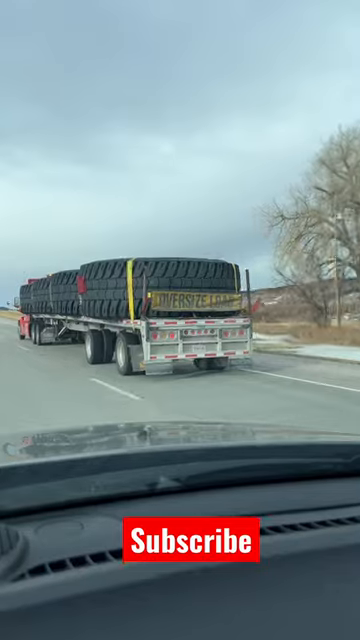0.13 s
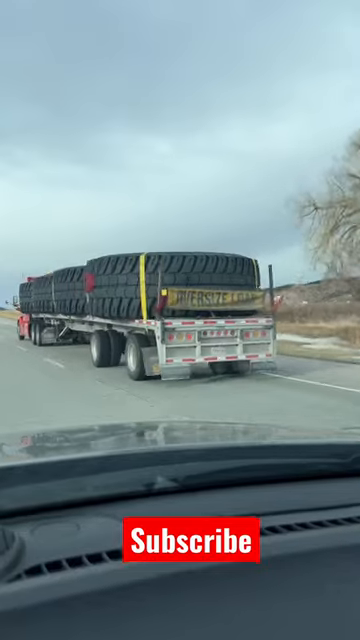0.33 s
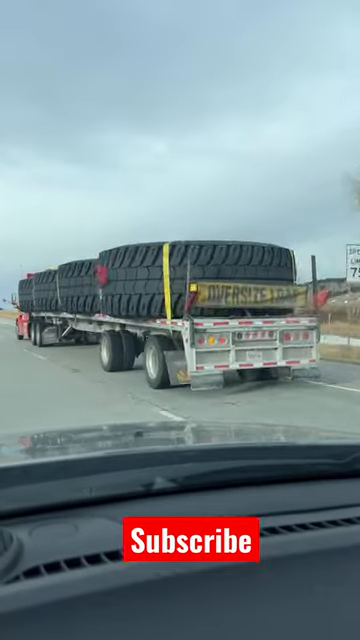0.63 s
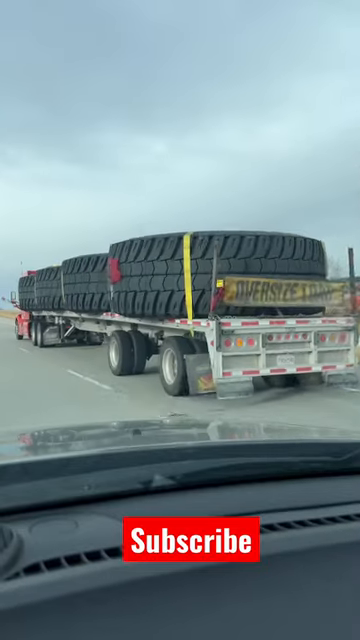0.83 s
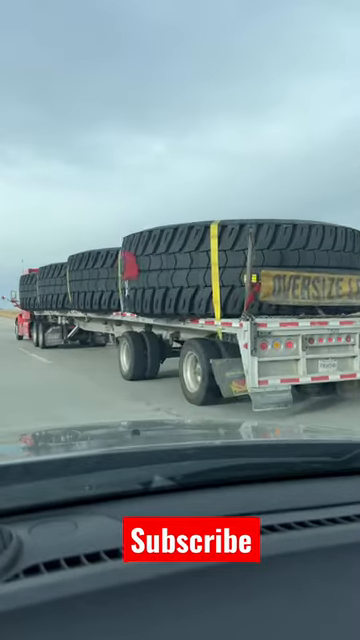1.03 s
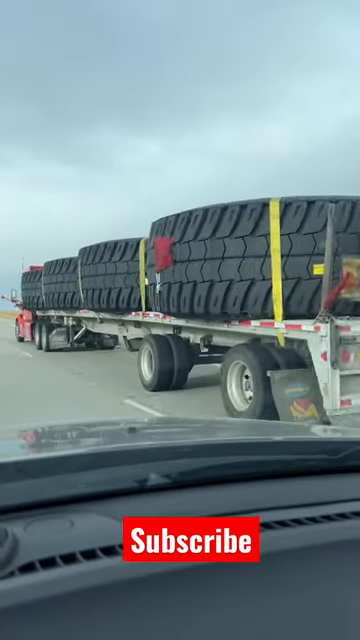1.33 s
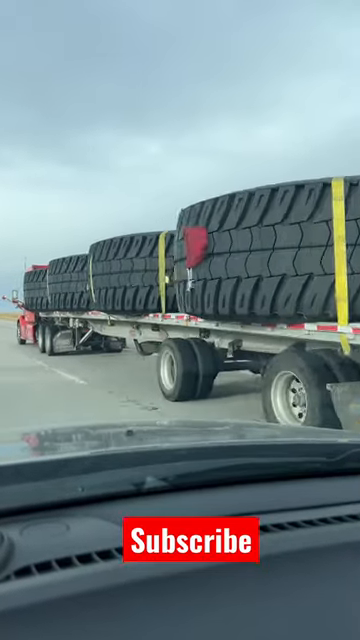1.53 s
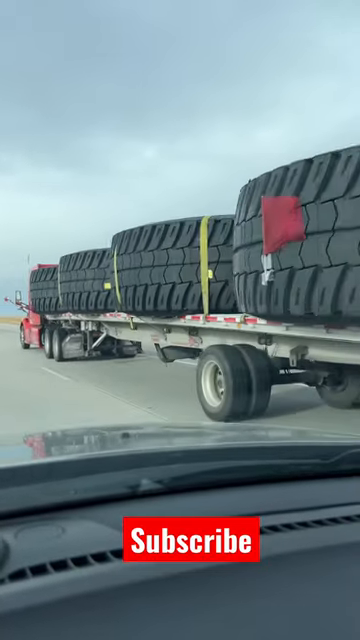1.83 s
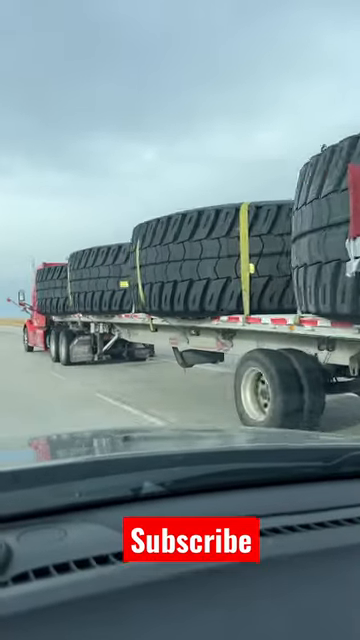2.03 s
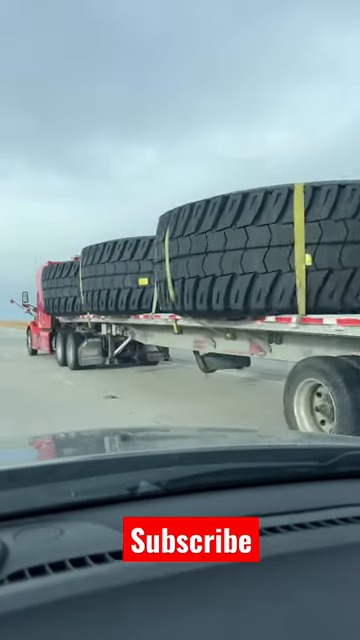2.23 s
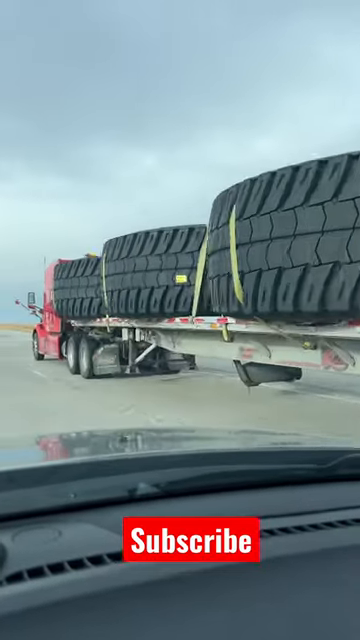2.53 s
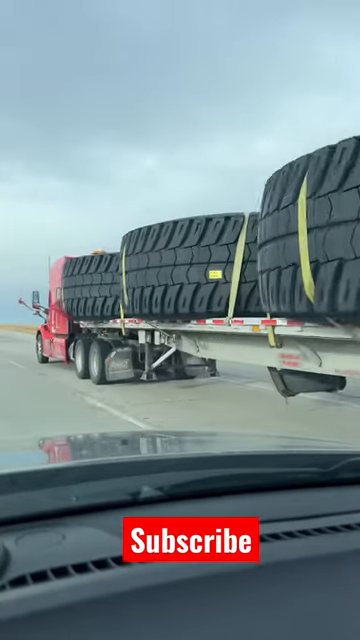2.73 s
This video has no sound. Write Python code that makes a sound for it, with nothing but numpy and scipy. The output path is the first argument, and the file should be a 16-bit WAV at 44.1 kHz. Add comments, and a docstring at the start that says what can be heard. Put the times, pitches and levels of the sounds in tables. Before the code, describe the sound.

Continuous low road rumble inside a car on a highway, starting abruptly after a tiny silence and running to the end at about 3 seconds. Bass boom and shudder swell irregularly several times a second, over steady drone and muffled tyre roar. Faint wind hiss flutters with small gusts from 0.4 to 1.8 s. A weak truck tread hum sinks slightly around 2 s; a brief soft hiss peaks at 2.1 s.

```python
"""Car overtaking a truck

Inside a car passing a flatbed truck on a highway. Shaped noise gives the road's shudder, boom and drone,
the tyres' roar and rasp, and the wind at windows and seals; narrow noise bands hum at fixed pitches.
The truck's tread is a wavering sine that sinks in pitch as its trailer wheels go by.
One brief bright hiss passes; a faint whine lies above it all."""
import sys
import numpy as np
from scipy import signal
from scipy.fft import rfft, irfft, next_fast_len
from scipy.io import wavfile
from scipy.ndimage import uniform_filter1d

SR = 44100
rng = np.random.default_rng(int(sys.argv[2]) if len(sys.argv) > 2 else 0)


def master(y):
    """Save y as 16-bit WAV."""
    cut = np.clip(np.atleast_2d(y).T, -1, 1)
    pcm = np.round(cut * 32767)  # scale
    wavfile.write(sys.argv[1], SR, pcm.astype(np.int16))


N = 126567
TIME_S = np.arange(N) / SR
FFT_SIZE = next_fast_len(N)
HZ = np.maximum(np.arange(FFT_SIZE // 2 + 1) * SR / FFT_SIZE, 1)
SIDES = np.array([[1], [-1]])  # left, right

# deep suspension shudder: time_s, level_db
SHUDDER_LEVEL = [(0.05, -24), (0.38, -30), (0.56, -41), (0.64, -23), (0.78, -30), (0.88, -26.5),
                 (1.0, -27.5), (1.3, -29), (1.53, -24), (1.9, -25.5), (2.03, -33), (2.48, -22.5),
                 (2.85, -32.5)]
# body boom: time_s, level_db
BOOM_LEVEL = [(0.05, -19), (0.2, -21.5), (0.27, -19), (0.34, -20.5), (0.43, -18), (0.5, -22), (0.62, -19.5),
              (0.73, -17), (0.84, -26), (0.92, -17.5), (0.98, -23.5), (1.05, -17), (1.2, -21.5),
              (1.43, -15.5), (1.75, -22), (1.87, -16), (1.97, -20.5), (2.08, -14), (2.18, -26), (2.31, -18),
              (2.4, -16), (2.59, -24), (2.67, -19.5), (2.73, -25), (2.85, -19.5)]
# road drone in the cabin: time_s, level_db
DRONE_LEVEL = [(0.05, -25.5), (0.14, -27.5), (0.24, -22), (0.35, -24.5), (0.6, -24.5), (0.86, -23),
               (0.99, -26), (1.08, -22), (1.28, -24.5), (1.49, -21.5), (1.67, -24.5), (1.88, -22.5),
               (1.97, -26.5), (2.22, -23.5), (2.3, -26.5), (2.45, -25), (2.54, -28.5), (2.6, -22.5),
               (2.7, -27), (2.85, -24.5)]
# low tyre roar: time_s, level_db
ROAR_LEVEL = [(0.05, -32.5), (0.2, -34.5), (0.41, -36), (0.5, -35.5), (0.56, -34), (0.83, -35),
              (1.04, -36.5), (1.25, -35), (1.45, -32.5), (1.55, -35), (1.62, -36.5), (1.68, -35.5),
              (1.88, -34.5), (2.03, -38.5), (2.08, -33), (2.33, -34), (2.6, -34.5), (2.85, -35)]
# higher tyre rasp: time_s, level_db
RASP_LEVEL = [(0.05, -36.5), (0.53, -36.5), (0.65, -37.5), (0.77, -37), (0.85, -38), (0.95, -36.5),
              (1.14, -37.5), (1.23, -35), (1.51, -37.5), (1.59, -34.5), (1.89, -36.5), (1.98, -34),
              (2.08, -37.5), (2.17, -35.5), (2.42, -36.5), (2.68, -37.5), (2.85, -36.5)]
# wind at the windows: time_s, level_db
WINDOW_LEVEL = [(0.05, -43), (0.25, -46.5), (0.4, -45), (0.75, -44.5), (0.95, -44.5), (1.25, -44.5),
                (1.5, -44.5), (1.63, -44.5), (1.75, -45), (2.1, -43.5), (2.3, -45), (2.85, -46)]
# thin hiss at the door seals: time_s, level_db (relative to SEAL_DB)
SEAL_LEVEL = [(0.2, -7), (0.35, -3), (0.53, -4), (0.7, -1.5), (0.93, -2), (1.02, 0), (1.3, -.5), (1.5, -.5),
              (1.68, -2.5), (1.85, 0), (2.0, -2), (2.14, -2), (2.23, -5), (2.85, -6)]
# short gusts over the door seals: peak_s, lift_db
SEAL_GUSTS = [(0.455, 7), (0.79, 5.5), (1.17, 2.5), (1.24, 4), (1.355, 3.5), (1.51, 2), (1.83, 1.5)]

# shudder spectrum: freq_hz, relative_density_db
SHUDDER_SPECTRUM = [(12, -38), (17, -26.5), (26, -8.5), (35, 18.5), (44, 8), (54, 14), (70, -14.5)]
# boom spectrum: freq_hz, relative_density_db
BOOM_SPECTRUM = [(46, -9.5), (56, 1), (70, 2.5), (100, 0), (108, -3.5), (128, -5), (145, -22), (200, -32.5)]
# drone spectrum: freq_hz, relative_density_db
DRONE_SPECTRUM = [(60, -44), (115, -16), (140, 0), (165, -1), (195, -3), (215, -3), (250, -5.5), (295, -7),
                  (350, -13.5), (450, -29), (900, -90)]
# roar spectrum: freq_hz, relative_density_db
ROAR_SPECTRUM = [(150, -43.5), (290, -5), (370, -1.5), (480, -2), (560, -4), (680, -23.5)]
# rasp spectrum: freq_hz, relative_density_db
RASP_SPECTRUM = [(450, -19), (580, -4), (640, -2), (750, 0), (900, -7.5), (1060, -11), (1250, -11),
                 (1500, -18), (2100, -27), (5000, -67)]
# window wind spectrum: freq_hz, relative_density_db
WINDOW_SPECTRUM = [(700, -30.5), (1400, -15), (1700, -7.5), (2000, -6.5), (2500, -0.5), (2900, -2),
                   (3300, -5.5), (4100, -10), (4700, -16.5), (6000, -26), (8200, -32.5), (9100, -50),
                   (15000, -57)]
# seal hiss spectrum: freq_hz, relative_density_db
SEAL_SPECTRUM = [(2500, -32.5), (4200, 1.5), (4900, -3.5), (5700, -3), (6500, -8), (7300, -20),
                 (8300, -24.5), (9100, -39.5), (15000, -50)]
# brief hiss spectrum: freq_hz, relative_density_db
HISS_SPECTRUM = [(3000, -25.5), (5000, -2.5), (6500, 1.5), (8300, -4), (10000, -13.5), (12000, -17.5),
                 (16000, -24)]

# rings of tyre cavities, panels, tread and air leaks: pitch_hz, width_hz, level_db, left_minus_right_db
RESONANCES = [(76, 42, -27.5, -0.5), (115.5, 4.5, -29, 0), (195.1, 11, -30.5, 0.5), (768, 31, -47.5, -1.5),
              (886, 17, -50.5, -1), (1107, 20, -56, 5.5), (1674, 36, -62.5, 4), (2520, 52, -65.5, 2)]
# faint high whine bands: pitch_hz, width_hz, level_db
WHINE_BANDS = [(9480, 65, -85), (9720, 65, -85.5)]
# likeness of the two sides: freq_hz, correlation (unitless)
SIDE_CORRELATION = [(60, 1), (190, .99), (260, 0.96), (340, 0.85), (450, 0.63), (620, 0.13), (790, 0.04),
                    (1080, 0.031), (1400, 0.15), (1700, .7), (2150, 0.32), (2500, -0.19), (3000, -0.21),
                    (3500, 0.42), (4050, 0.31), (4700, -0.25), (5600, 0.31), (7000, 0.35), (8300, 0.77),
                    (9500, 1)]
# cabin balance: freq_hz, left_minus_right_db
CABIN_BALANCE = [(60, -1.23), (200, -1), (300, -1), (750, -1.7), (1000, 1), (1250, 2.5), (1600, 0),
                 (3000, -0.5), (3700, -0.5), (4500, 0)]

# flutter and wander are rms
ROAR_FLUTTER_DB, RING_WANDER_DB = 0.73, .9
TREAD_HZ, DOPPLER_HZ, TREAD_WAVER_HZ, TREAD_FLUTTER_DB = 984, 14, 7, 3.5
TREAD_DB, TREAD_PAN_DB = -47.5, 6
ALONGSIDE_S, PASS_S = 2.02, 0.36
SEAL_DB = -58.5
WIND_FLUTTER_DB, SEAL_FLUTTER_DB = .55, .7
GUST_RISE_S, GUST_FALL_S, GUST_WINDOW_SHARE = .02, .02, .35
HISS_S, HISS_RISE_S, HISS_FALL_S, HISS_DB, HISS_FLUTTER_DB = 2.127, .11, .028, -61.5, 1.8
FLICK_S, FLICK_DB = .003, -63
START_S, FADE_S, STOPBAND_HZ = .0355, .002, 16600


def from_db(db):
    """Decibels to gain."""
    return 10 ** (np.asarray(db) / 20)


def rms_one(x):
    """Scale to an rms of 1."""
    return x / np.sqrt(np.mean(x ** 2) + 1e-20)


def in_time(rows):
    """Table value at every sample."""
    return np.interp(TIME_S, *np.transpose(rows))


def over_hz(rows):
    """Table value at every frequency, joined on a log axis."""
    freq_hz, value = np.transpose(rows)
    return np.interp(np.log(HZ), np.log(freq_hz), value)


def drift(rate_hz):
    """Low-passed random wander, rms 1, halved in amplitude at rate_hz."""
    spectrum = rfft(rng.standard_normal(FFT_SIZE))
    return rms_one(irfft(spectrum / (1 + (HZ / rate_hz) ** 2), FFT_SIZE)[:N])


def surge(at_s, rise_s, fall_s):
    """Exponential swell to 1 at at_s, then exponential decay."""
    return np.exp(-np.maximum((at_s - TIME_S) / rise_s, (TIME_S - at_s) / fall_s))


def cabin_noise(gain, pan_db):
    """Shaped stereo noise, rms 1; the two sides correlate by frequency, closely in the bass."""
    mid, side = rfft(rng.standard_normal((2, FFT_SIZE)))
    alike = np.clip(over_hz(SIDE_CORRELATION), -.999, .999)
    both = np.sqrt(1 + alike) * mid + SIDES * np.sqrt(1 - alike) * side
    panned = both * gain * from_db(SIDES * pan_db / 2)
    return rms_one(irfft(panned, FFT_SIZE)[:, :N])


def steadied(x, span_s):
    """Even out swells slower than span_s; rms 1."""
    size = max(int(span_s * SR), 2)
    power = np.mean(x ** 2, axis=0)
    power = uniform_filter1d(uniform_filter1d(power, size), size)
    return rms_one(x / np.sqrt(np.abs(power) + 1e-9))


def rush(spectrum, span_s):
    """Steadied broad noise of a given spectrum, falling steeply beyond the table's ends."""
    low_hz, high_hz = spectrum[0][0], spectrum[-1][0]
    skirts = np.minimum(1, np.minimum(HZ / low_hz, high_hz / HZ)) ** 5
    gain = from_db(over_hz(spectrum)) * skirts
    return steadied(cabin_noise(gain, over_hz(CABIN_BALANCE)), span_s)


def ring(pitch_hz, width_hz, pan_db, span_s):
    """Steadied narrow noise band with a resonance's bell-shaped response."""
    response = 1 / (1 + ((HZ - pitch_hz) / width_hz * 1.62) ** 2)
    return steadied(cabin_noise(response, pan_db), span_s)


def road():
    """Rough surface drives suspension shudder, body boom, cabin drone, tyre roar and rasp."""
    shudder = from_db(in_time(SHUDDER_LEVEL)) * rush(SHUDDER_SPECTRUM, span_s=0.036)
    boom = from_db(in_time(BOOM_LEVEL)) * rush(BOOM_SPECTRUM, span_s=.035)
    drone = from_db(in_time(DRONE_LEVEL)) * rush(DRONE_SPECTRUM, span_s=0.05)
    roar_db = in_time(ROAR_LEVEL) + ROAR_FLUTTER_DB * drift(10)  # road texture flutters the roar
    roar = from_db(roar_db) * rush(ROAR_SPECTRUM, span_s=0.16)
    rasp = from_db(in_time(RASP_LEVEL)) * rush(RASP_SPECTRUM, span_s=0.21)
    return shudder + boom + drone + roar + rasp


def rings():
    """Tyre cavities, panels, tread and air leaks hum at fixed pitches, each wandering in level by itself."""
    total = 0
    for pitch_hz, width_hz, level_db, pan_db in RESONANCES:
        wandering_db = level_db + RING_WANDER_DB * drift(4.3)
        total = total + from_db(wandering_db) * ring(pitch_hz, width_hz, pan_db, span_s=0.19)
    return total


def truck():
    """Trailer's rough tread note, beamed sideways: swells, sinks by Doppler shift and fades as wheels pass."""
    behind = (TIME_S - ALONGSIDE_S) / PASS_S
    nearness = 1 / np.hypot(1, behind)
    pitch_hz = TREAD_HZ - DOPPLER_HZ * behind * nearness + TREAD_WAVER_HZ * drift(23)
    note = np.sqrt(2) * np.sin(2 * np.pi * np.cumsum(pitch_hz) / SR)
    level_db = TREAD_DB + TREAD_FLUTTER_DB * drift(17) + SIDES * TREAD_PAN_DB / 2
    return from_db(level_db) * nearness ** 2 * note


def wind():
    """Air rushes past glass and seals; turbulence flutters both together, gusts lift the seals most."""
    flutter = drift(33.0)
    gusts_db = sum(lift_db * surge(peak_s, GUST_RISE_S, GUST_FALL_S) for peak_s, lift_db in SEAL_GUSTS)
    window_db = in_time(WINDOW_LEVEL) + WIND_FLUTTER_DB * flutter + GUST_WINDOW_SHARE * gusts_db
    seal_db = SEAL_DB + in_time(SEAL_LEVEL) + SEAL_FLUTTER_DB * flutter + gusts_db
    windows = from_db(window_db) * rush(WINDOW_SPECTRUM, span_s=0.089)
    seals = from_db(seal_db) * rush(SEAL_SPECTRUM, span_s=.1)
    return windows + seals


def brief_hiss():
    """Bright noise swells raggedly, peaks with a light flick and drops away."""
    ragged_db = HISS_DB + HISS_FLUTTER_DB * drift(50)
    swell = from_db(ragged_db) * surge(HISS_S, HISS_RISE_S, HISS_FALL_S)
    flick = from_db(FLICK_DB) * surge(HISS_S, FLICK_S, FLICK_S)
    return (swell + flick) * rush(HISS_SPECTRUM, span_s=.3)


def whine():
    """Two thin, steady, high noise bands."""
    return sum(from_db(level_db) * ring(pitch_hz, width_hz, 0, span_s=.02)
               for pitch_hz, width_hz, level_db in WHINE_BANDS)


def scene():
    """Sum of all layers in the cabin."""
    return road() + rings() + truck() + wind() + brief_hiss() + whine()


def record(dry):
    """Silence until an abrupt fade-in; low-pass cuts the top."""
    opened = np.clip((TIME_S - START_S) / FADE_S, 0, 1)
    low_pass = signal.cheby2(12, 70, STOPBAND_HZ, fs=SR, output="sos")
    return signal.sosfilt(low_pass, dry * opened)


dry = scene()
out = record(dry)
master(out)
```